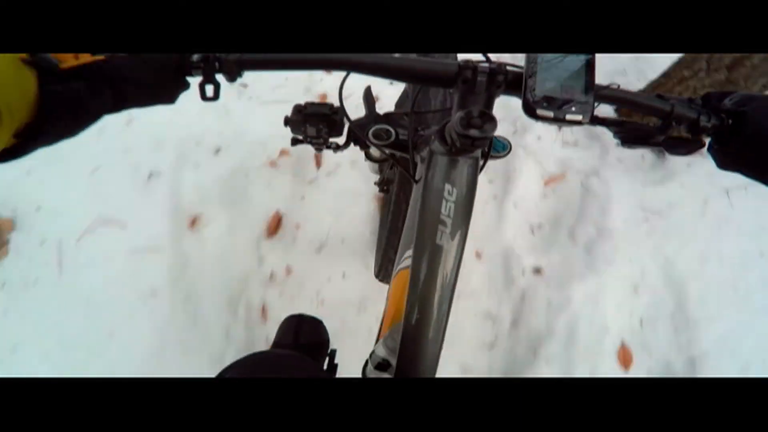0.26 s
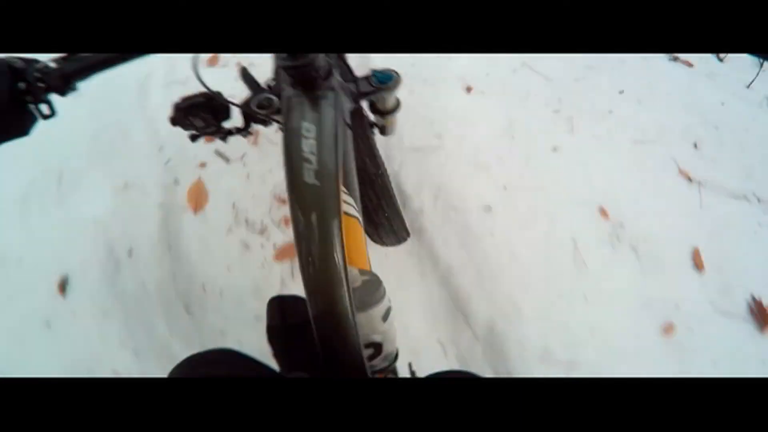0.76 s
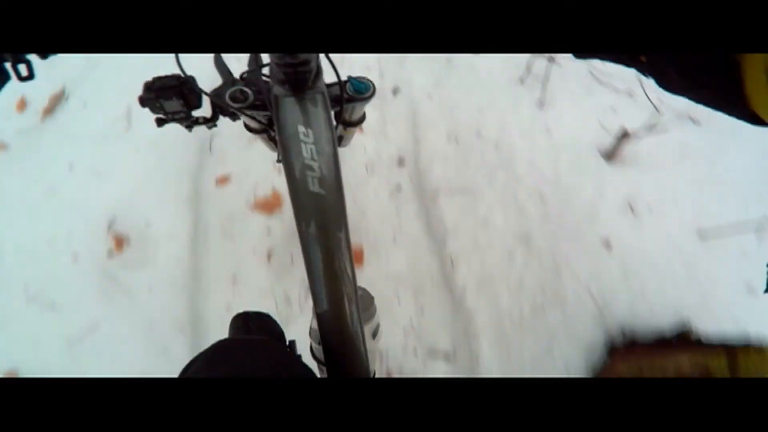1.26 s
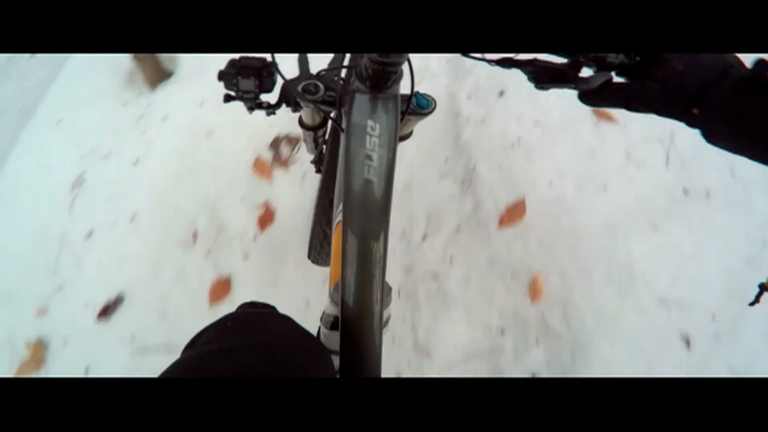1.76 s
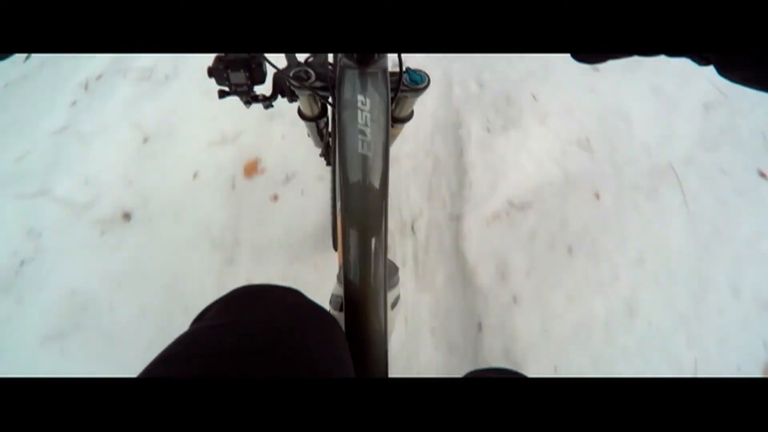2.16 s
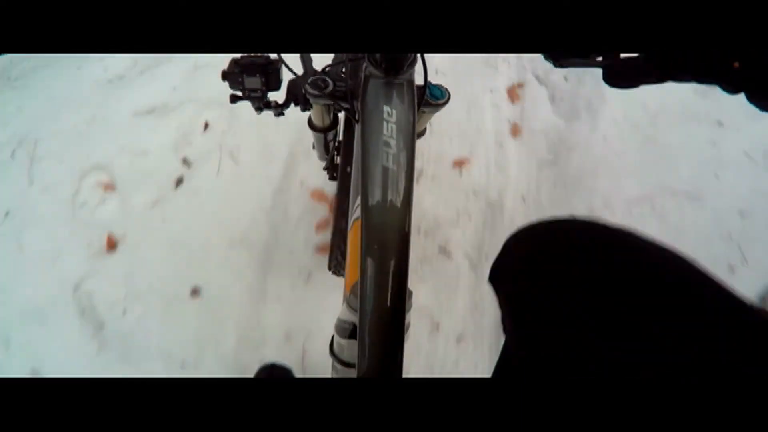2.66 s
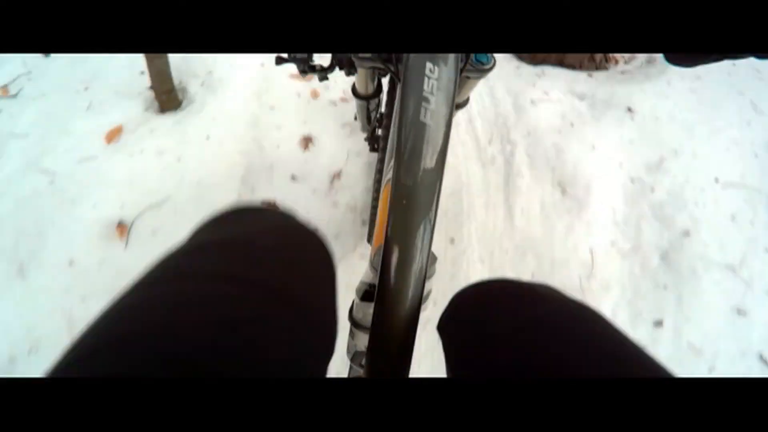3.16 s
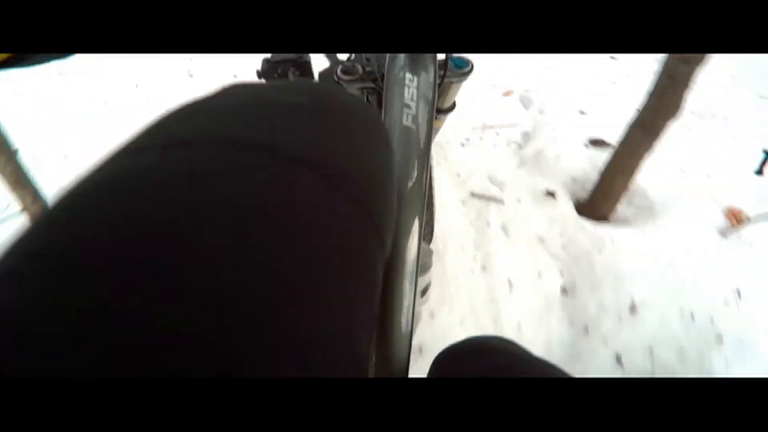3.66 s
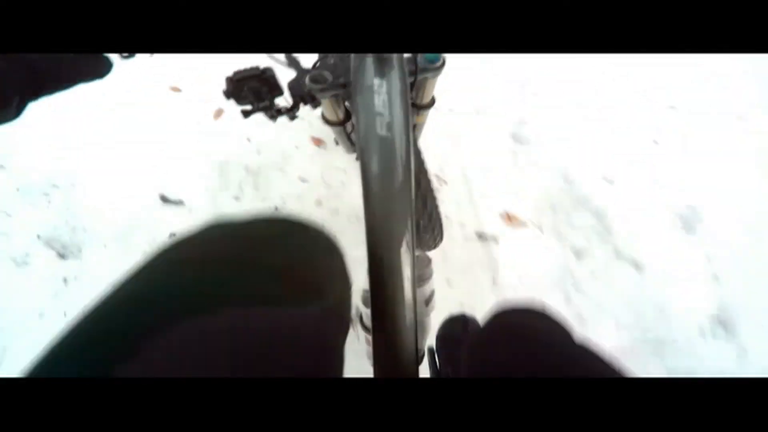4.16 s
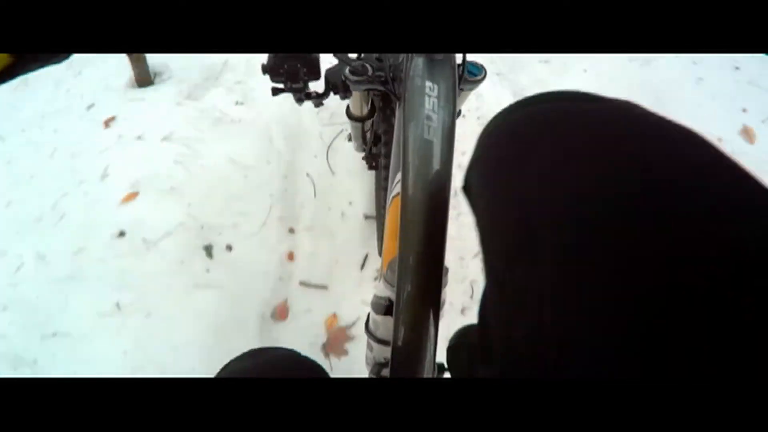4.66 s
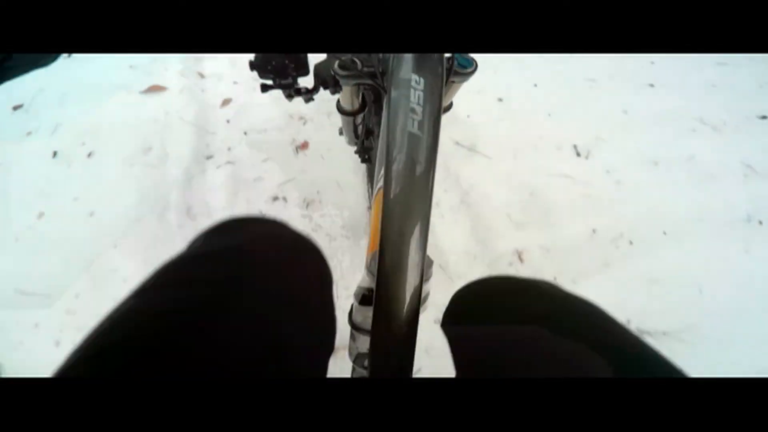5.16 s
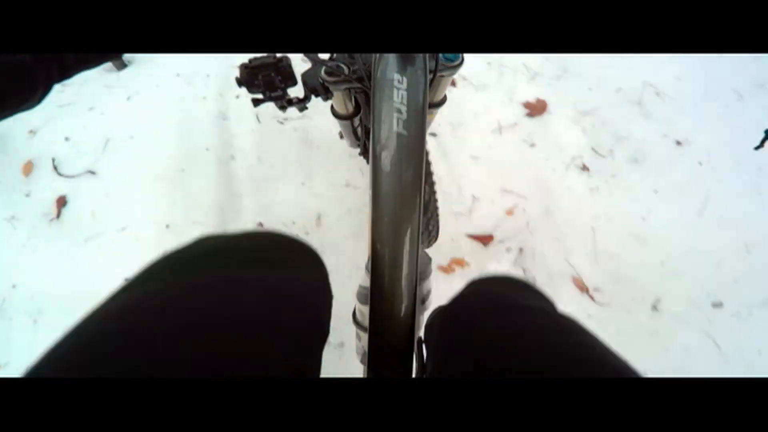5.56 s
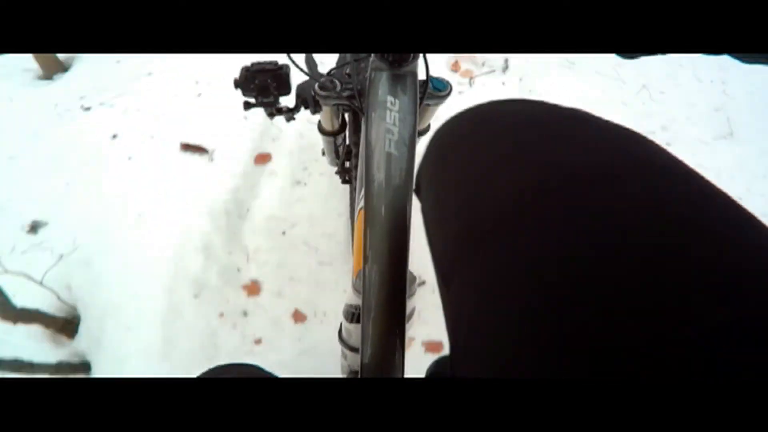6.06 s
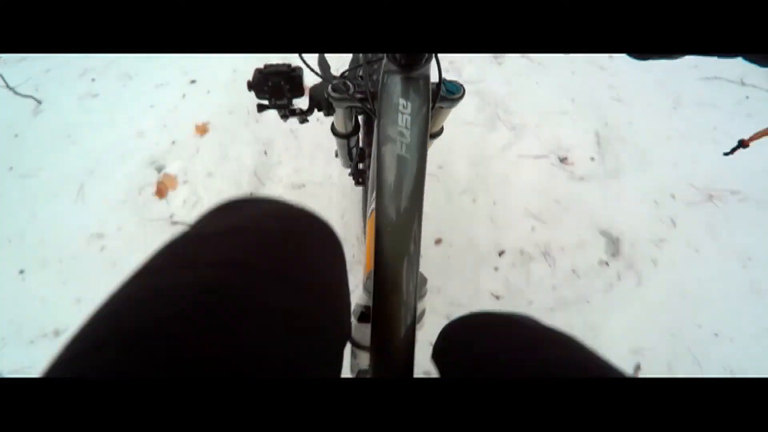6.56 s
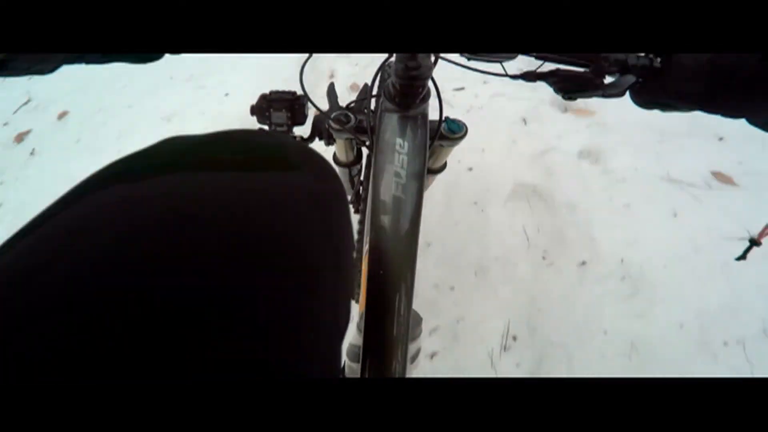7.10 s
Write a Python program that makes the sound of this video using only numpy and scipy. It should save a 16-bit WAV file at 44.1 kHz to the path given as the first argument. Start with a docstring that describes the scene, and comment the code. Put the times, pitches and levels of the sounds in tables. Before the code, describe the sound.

Close on a bicycle in snow: a burst of rattling knocks and crackling crust, a few sharp shifter clicks, then soft, pulsing snow crunch.

```python
"""A snowy trail, ridden by a mountain bike and heard from a camera on the rider's chest.
The tyres crunch and throw up fine snow: shaped noise and random grains, louder on rough ground and in surges.
Bumps knock the camera case in its mount: resonators excited by impacts, amid rumble and chatter.
The gears click as damped steel modes, chain and ice tick as noise pings,
and the camera's electronics whine faintly as one wavering sine."""
import sys
import numpy as np
from scipy import signal
from scipy.fft import rfft, irfft, next_fast_len
from scipy.io import wavfile
from scipy.ndimage import uniform_filter1d, map_coordinates

SR = 44100
rng = np.random.default_rng(int(sys.argv[2]) if len(sys.argv) > 2 else 0)


def digitize_waveform(pressure):
    """Quantize a signal to 16-bit integers and store it at the path in sys.argv[1].

    Rows of a 2-D input are taken as channels; values are limited to [-1, 1].
    """
    field = np.atleast_2d(pressure).T
    bounded = np.clip(field, -1, 1)
    quanta = np.round(bounded * 32767).astype(np.int16)
    wavfile.write(sys.argv[1], SR, quanta)


N = 323473


def amp(db):
    """Level law: decibels to an amplitude ratio."""
    return 10 ** (np.asarray(db) / 20)


def unit(x):
    """Power normalisation: scale to rms 1."""
    return x / np.sqrt(np.mean(x ** 2) + 1e-20)


def peak_one(x):
    """Peak normalisation: scale to a largest magnitude of 1."""
    return x / np.abs(x).max()


def wobble(rate):
    """Slow random modulation: a smooth curve through rate random knots a second."""
    knots = rng.standard_normal(int(N * rate / SR) + 4)
    return map_coordinates(knots, [np.arange(N) * rate / SR])


def filtered(x, response):
    """Linear filtering: the spectrum of x times a response of frequency."""
    size = next_fast_len(len(x) + 8192)
    spectrum = rfft(x, size) * response(np.fft.rfftfreq(size, 1 / SR))
    return irfft(spectrum, size)[:len(x)]


def coloured(x, points):
    """Spectral shaping: filter x through (Hz, dB) points on a log frequency axis, at rms 1."""
    f, db = np.transpose(points)

    def response(hz):
        return amp(np.interp(np.log(hz + 1), np.log(f), db, left=-120, right=-120))
    return unit(filtered(x, response))


def grains(rate, spread_db):
    """Shot noise: random impulses of uneven size and either sign, rate a second, at rms 1."""
    size = amp(spread_db * np.minimum(rng.exponential(size=N), 3))
    struck = rng.random(N) < rate / SR
    return unit(struck * size * rng.choice([-1, 1], N))


def ring(modes, t, scatter_db, detune):
    """Modal decay: a sum of damped sines, struck at slightly new strengths and pitches."""
    hz, db, t60 = np.transpose(modes)[:, :, None]
    level, pitch = rng.standard_normal((2, len(modes), 1))
    decay = amp(db + scatter_db * level - 60 * t / t60)
    return np.sum(decay * np.sin(2 * np.pi * hz * (1 + detune * pitch) * t), axis=0)


def add(track, s, sound):
    """Superposition: mix a sound in at time s."""
    part = track[round(s * SR):][:len(sound)]
    part += sound[:len(part)]


# How hard the tyres work the snow, high over two rough stretches: t/s, crunch level/dB
TYRE_LOAD = [(0, -57), (0.52, -56), (0.63, -52.5), (0.85, -40), (1.02, -45.5), (1.15, -49.5), (1.35, -54.5),
             (2.6, -54), (2.88, -50), (3.0, -51.5), (3.12, -57.5), (3.9, -60.5), (5.2, -59.5), (6.1, -59),
             (6.55, -64), (6.95, -59), (7.2, -63), (7.33, -63)]


def tyre_load():
    """Quasi-static forcing: the load in dB of crunch, interpolated between the table's times."""
    s, db = np.transpose(TYRE_LOAD)
    return np.interp(np.arange(N) / SR, s, db)


def follow(cruise_db, slope):
    """Power law: gain of a layer rising by slope dB per dB of load from cruise_db at cruising load."""
    cruising_load_db = -57
    return amp(cruise_db + slope * (tyre_load() - cruising_load_db))


# Surges of snow, from a skid or about one to a pedal stroke: t/s, crunch level/dB, spray level/dB
SNOW_SURGES = [(0.09, -57, -66), (0.37, -64, -59), (0.78, -44, -45.5), (2.13, -66, -59), (3.0, -57, -52),
               (3.56, -53.5, -68), (3.67, -59.5, -61), (4.12, -58, -51), (4.22, -57.5, -57),
               (4.53, -63, -60), (4.95, -58.5, -60), (5.08, -62, -60), (5.24, -55, -73), (5.6, -54, -63),
               (5.9, -59.5, -69), (6.38, -62.5, -62.5), (6.71, -58.5, -68), (7.02, -54.5, -62)]


def surges():
    """Power addition of transients: crunch and spray gains that swell quickly and ebb more slowly."""
    rise_s, fall_s = .035, .051
    s, crunch_db, spray_db = np.transpose(SNOW_SURGES)
    t = np.arange(N) / SR - s[:, None]
    power = np.exp(-np.minimum((t / np.where(t < 0, rise_s, fall_s)) ** 2, 20))
    return np.sqrt(amp([crunch_db, spray_db]) ** 2 @ power)


def patchy(x, depth_db):
    """Time-frequency modulation: each clump of snow favours its own band for a moment."""
    bins = signal.stft(x, nperseg=256)[2]
    field = uniform_filter1d(rng.standard_normal(bins.shape), size=5, axis=0)
    field = uniform_filter1d(field, size=7, axis=1)
    return signal.istft(bins * amp(depth_db * unit(field)), nperseg=256)[1][:N]


# Spectrum of snow crushed under the tread: f/Hz, relative spectral level/dB
CRUNCH_SPECTRUM = [(900, -19.5), (1800, -13), (2400, -5.5), (3300, 0), (4300, -4.5), (5400, -4),
                   (6700, -7.5), (8000, -7.5), (10000, -31), (15000, -49)]
# Spectrum of powder thrown off the wheels: f/Hz, relative spectral level/dB
SPRAY_SPECTRUM = [(3000, -23), (4500, -0.5), (5500, 0), (7000, -4.5), (9500, -2), (11500, -8),
                  (14000, -13.5), (15500, -28)]


def tyres():
    """Granular fracture: snow crystals break in clumps; loosened powder hisses off the wheels."""
    surge_crunch, surge_spray = surges()
    clumps = wobble(90)  # shared by both layers
    crystals = patchy(grains(rate=1500, spread_db=3) + .725 * rng.standard_normal(N), depth_db=2)
    powder = patchy(grains(rate=2500, spread_db=.5) + .82 * rng.standard_normal(N), depth_db=3)
    # steady and surging parts add in power
    crunch_gain = np.hypot(amp(tyre_load()), surge_crunch) * amp(clumps + .48 * wobble(18))
    spray_gain = np.hypot(follow(cruise_db=-62, slope=.7), surge_spray)
    spray_gain *= amp(.8 * clumps + .46 * wobble(36))
    crunch = crunch_gain * coloured(crystals, CRUNCH_SPECTRUM)
    spray = spray_gain * coloured(powder, SPRAY_SPECTRUM)
    return crunch + spray


# The snow crust gives way: t/s, rms level at the centre/dB, Gaussian half length/s
CRUST_BREAKS = [(0.676, -40.5, .014), (0.734, -43.5, 0.0066), (0.881, -36, 0.0089), (0.93, -36, 0.012),
                (0.986, -34.5, 0.0083), (1.078, -46, 0.0098), (2.884, -41, 0.0042), (2.907, -37, .004)]
# Spectrum of the breaking crust: f/Hz, relative spectral level/dB
CRUST_SPECTRUM = [(900, -6), (2000, -7.5), (3300, 4.5), (4300, 1), (6000, 4.5), (8000, -1.5), (10500, -14),
                  (15000, -28.5)]


def crusts():
    """Brittle collapse: coarse grains, each a brief noise burst, crackle in a short Gaussian swell."""
    t = np.arange(N) / SR
    swell = sum(amp(db) * np.exp(-((t - s) / length) ** 2 / 2) for s, db, length in CRUST_BREAKS)
    grain_power = uniform_filter1d(grains(rate=640, spread_db=3) ** 2, size=50)
    shards = rng.standard_normal(N) * np.sqrt(np.abs(grain_power))
    return swell * coloured(shards, CRUST_SPECTRUM)


# Resonances of the camera case: f/Hz, bandwidth/Hz, relative level/dB
CASE_MODES = [(146.3, 43, -4.5), (377, 240, -12.5), (371.4, 58, -12), (826, 280, -10.5), (914, 590, -26),
              (1239, 287, -1.5), (1374.5, 226, 1), (1866, 84, -8), (1998, 460, -11.5), (3330, 1000, -17),
              (3940, 699, -41), (6970, 1200, -33.5)]


def case_response(hardness_db, weight_db, change):
    """Modal impulse response: hard contact favours the high resonances, a heavy one the low ones."""
    size = SR // 10
    f = np.fft.rfftfreq(size, 1 / SR)
    hz, width, db = np.transpose(CASE_MODES)[:, :, None]
    weight = np.interp(hz, [600, 1100], [weight_db, 0])
    hardness = np.interp(hz, [1500, 3000], [0, hardness_db])
    # change scatters pitch and level from blow to blow
    pitch, level = change * rng.standard_normal((2, len(CASE_MODES), 1))
    db = db + weight + hardness + .7 * level
    hz = hz * (1 + .012 * pitch)
    sign = (-1) ** np.arange(len(CASE_MODES))[:, None]
    modes = sign * amp(db) * 1j * f * width / (hz ** 2 - f ** 2 + 1j * f * width)
    # the plastic's give at the contact dulls the top
    blow = irfft(modes.sum(0) / (1 + 1j * f / 7000) ** 4, size)
    return signal.sosfilt(signal.butter(4, 8500, fs=SR, output="sos"), blow)


# The case knocks in its mount: t/s, level/dB, hardness/dB, weight/dB
# (the case takes half the hardness and weight, the buckle and graze the whole hardness)
CASE_KNOCKS = [(0.5904, -30, 7.5, 6), (0.6287, -6, 9, 4.5), (0.6586, -11, -6, -2),
               (0.733, -22.5, -4.5, 0.5), (0.8253, -31, -14, 10), (0.8502, -5.5, -1.5, -7),
               (0.9059, -17, -20.5, -1), (0.9114, -18.5, -19.5, -1), (0.9389, -3.5, -7.5, -5),
               (1.0198, -15, -7.5, -2.5), (1.0237, -11, -7.5, 2.5), (1.0422, -14, 8.5, 9),
               (1.047, -22.5, 16, -14), (1.0505, -3.5, -2.5, -3.5), (1.1504, -31.5, 6, 3),
               (1.187, -12, 3.5, -5), (2.0714, -20, 4.5, 10), (2.2906, -33, -8, 15), (2.3668, -24, 3.5, 10),
               (2.914, -12, -1.5, -3), (2.9298, -8, 15.5, -1), (2.9422, -7, 15, -9), (3.031, -33, 10, -13),
               (3.103, -41, 0, -13), (3.5089, -32, 2, 6), (5.8679, -35, -13, 13), (6.0405, -43, -3, -10),
               (6.6198, -28.5, -11, 10), (6.8475, -14.5, 6, 7), (6.923, -36, 3, -4), (6.942, -26, 5, 8),
               (6.951, -16, 1.5, 4)]
# Modes of the mount's buckle: f/Hz, relative level/dB, t60/s
BUCKLE_MODES = [(347.6, -1.5, 0.0204), (683, 4.5, 0.025), (1092, -7, 0.0094), (1880, 5, 0.03),
                (2680, -11.5, 0.016), (3150, -10.5, 0.0186), (3730, -8, .012), (4660, -7, .012)]


def knocks():
    """Impact excitation: the case hits its mount and rebounds; harder blows clatter the buckle more."""
    out, t = np.zeros(N), np.arange(SR // 16) / SR
    plain_peak = np.abs(case_response(0, 0, change=0)).max()
    graze_spectrum = [(1200, -8), (2000, -3), (3400, .5), (4500, -5), (5500, -13), (8000, -19.5), (9500, -57)]
    for s, db, hardness_db, weight_db in CASE_KNOCKS:
        # the hit and two lighter rebounds: delay in s, share of the amplitude
        for delay, share in [(0, 1), (.00064, .14), (.00286, .25)]:
            blow = case_response(hardness_db / 2, weight_db / 2, change=1.5) / plain_peak
            add(out, s + delay, amp(db) * share * blow)
        # the surfaces graze each other for a few milliseconds
        graze = coloured(rng.standard_normal(len(t)), graze_spectrum)
        graze *= amp(-60 * t / .016) * (1 - np.exp(-t / .0004))
        buckle = ring(BUCKLE_MODES, t, scatter_db=2.5, detune=.02)
        clatter = amp(-28.5) * buckle + amp(-18) * graze
        add(out, s + .0003, amp(db + hardness_db) * clatter)
    return out


def shake():
    """Exponential build-up and decay: the jolt around each knock, as strong as the knock itself."""
    t, time_constant_s = np.arange(N) / SR, .043
    jolts = [amp(db) * np.exp(-np.abs(t - s) / time_constant_s) for s, db, _, _ in CASE_KNOCKS]
    return np.max(jolts, axis=0)


# Spectrum of the ground rumble: f/Hz, relative spectral level/dB
RUMBLE_SPECTRUM = [(15, 20.5), (28, 7), (50, -1.5), (120, 0.5), (350, -0.5), (650, -4.5), (1000, -8.5),
                   (2000, -9), (3500, -25)]


def ride():
    """Structure-borne sound: rough ground rumbles through the rider and chatters the case in its mount."""
    jolt = shake()
    rumble = amp(1.5 * wobble(25)) * coloured(rng.standard_normal(N), RUMBLE_SPECTRUM)
    case = case_response(hardness_db=-4, weight_db=-13, change=0)
    chatter = unit(signal.fftconvolve(grains(rate=170, spread_db=3.5), case)[:N])
    # load and jolt add in power; jolt levels are dB re the knock
    rumble_gain = np.hypot(follow(cruise_db=-58, slope=.43), amp(-37) * jolt)
    chatter_gain = np.hypot(follow(cruise_db=-65.5, slope=.85), amp(-41.5) * jolt)
    return rumble_gain * rumble + chatter_gain * chatter


# Gear shifts: t/s, peak level of the main contact/dB
GEAR_SHIFTS = [(2.7245, -18), (2.7634, -16.5), (2.851, -19.5)]
# Steel modes of the shifter: f/Hz, relative level/dB, t60/s
SHIFTER_MODES = [(2250, -13, .05), (2890, -6, .055), (4600, -10, .025), (5000, -6, .025), (5300, -6, .035),
                 (5700, 0, .025), (6500, -5, .025), (7200, -5, .025), (8150, -2, .025), (8800, -7, .035)]


def shifts():
    """Ratchet impacts: the pawl touches, snaps over a tooth and settles, ringing steel as it scrapes."""
    out, t = np.zeros(N), np.arange(SR // 8) / SR
    scrape_spectrum = [(1500, -30), (3000, -9), (6000, -.5), (8500, 0), (10000, -13), (15000, -35)]
    for s, db in GEAR_SHIFTS:
        # touch, snap, settle: delay in s, level in dB
        for delay, contact_db in [(-.0017, -8), (.0003, 0), (.0028, -7)]:
            scrape = coloured(rng.standard_normal(len(t)), scrape_spectrum)
            scrape *= amp(-60 * t / .012)
            steel = ring(SHIFTER_MODES, t, scatter_db=3, detune=.01)
            onset = 1 - np.exp(-t / .0003)
            click = (peak_one(steel) + .6 * peak_one(scrape)) * onset
            add(out, s + delay, amp(db + contact_db) * peak_one(click))
    return out


# Small ticks of chain and ice: t/s, peak level/dB, centre f/Hz, t60/s
SMALL_TICKS = [(0.69, -38, 3500, .01), (0.8182, -24.5, 6750, 0.016), (0.951, -23, 5960, 0.01),
               (1.0737, -29, 6960, 0.019), (1.127, -33, 3220, 0.0085), (1.2224, -27, 3280, 0.0062),
               (1.3793, -31, 5450, .01), (1.42, -30.5, 5130, .008), (2.274, -35, 1940, 0.017),
               (2.8219, -24.5, 4400, 0.0049), (2.826, -26, 5000, 0.0049), (2.9693, -28.5, 8000, 0.013),
               (2.982, -28.5, 7100, 0.018), (2.9923, -21.5, 6770, 0.01), (2.997, -29.5, 2900, 0.024),
               (3.176, -38, 6500, 0.036)]


def ticks():
    """Band-limited transients: chain links and bits of ice give short, broad pings of decaying noise."""
    out, t = np.zeros(N), np.arange(SR // 20) / SR
    for s, db, pitch_hz, t60 in SMALL_TICKS:
        ping = filtered(rng.standard_normal(len(t)),
                        lambda hz: np.exp(-(np.log((hz + 1) / pitch_hz) / .5) ** 2))
        add(out, s, amp(db) * peak_one(ping * amp(-60 * t / t60)))
    return out


def whine():
    """Frequency modulation: a thin tone from the camera's electronics, wavering slightly."""
    frequency_hz = 7693 + 3 * wobble(9.4)
    phase = 2 * np.pi * np.cumsum(frequency_hz) / SR
    return amp(-71.5 + 1.5 * wobble(6)) * np.sin(phase)


def scene():
    """Superposition: bike, snow and camera, all close to the one microphone."""
    return (tyres() + crusts() + knocks() + ride() + shifts() + ticks() + whine())[None]


def record(dry):
    """Saturation and band limiting: the microphone rounds off the hardest knocks and cuts the top."""
    top_hz = 15800
    rounded = dry[0] / (1 + dry[0] ** 4) ** (1 / 4)
    return filtered(rounded, lambda hz: hz < top_hz)[None]


dry = scene()
out = record(dry)
digitize_waveform(out)
```